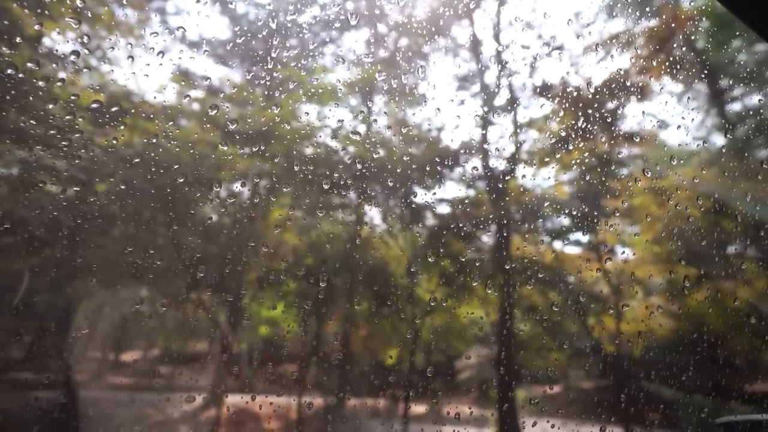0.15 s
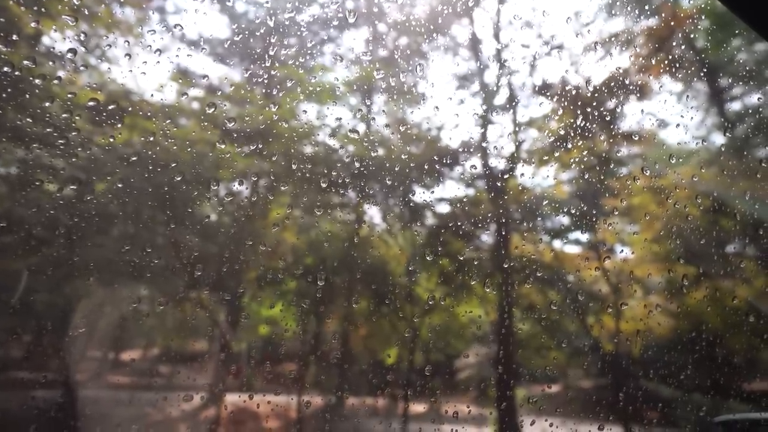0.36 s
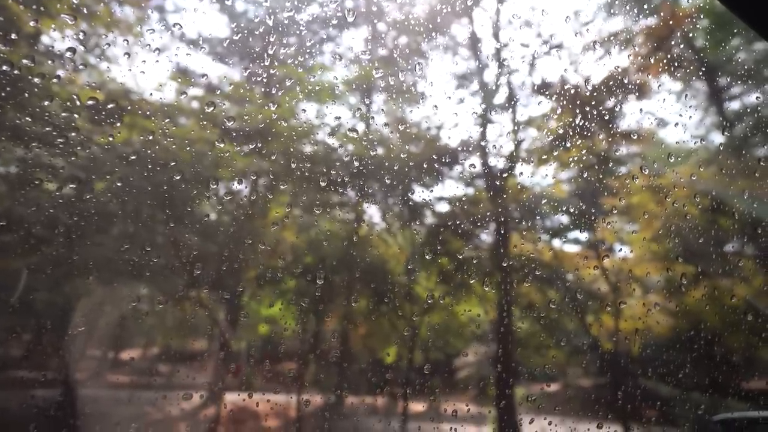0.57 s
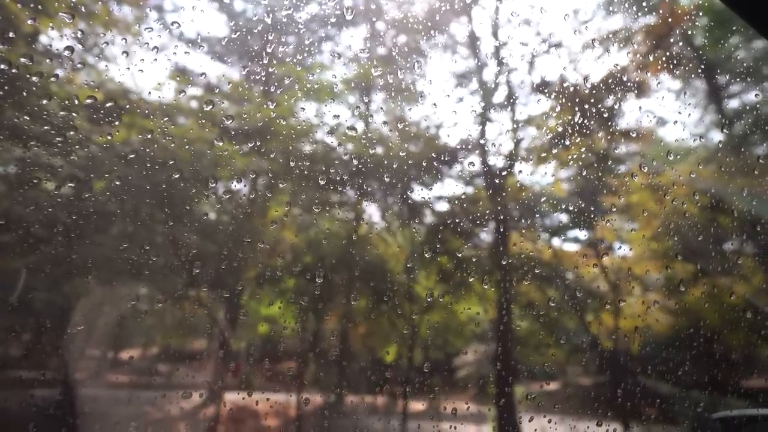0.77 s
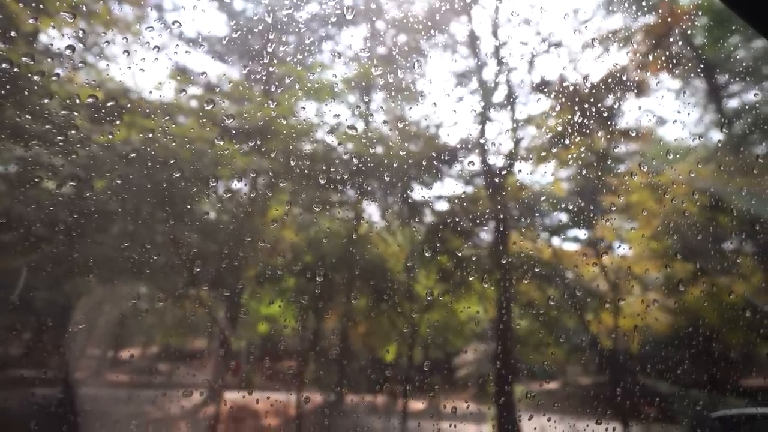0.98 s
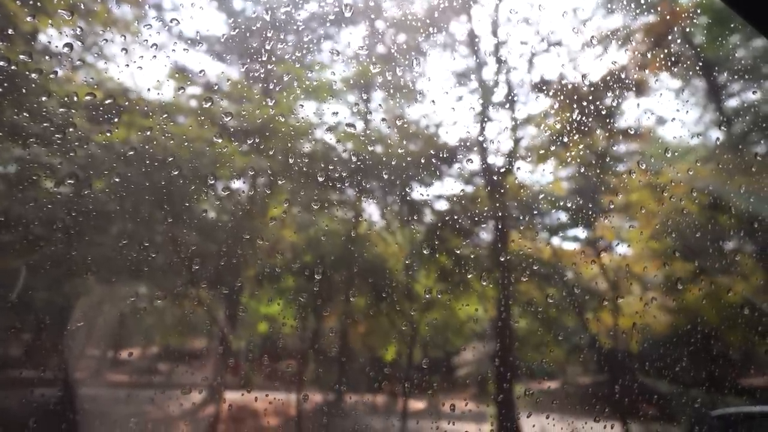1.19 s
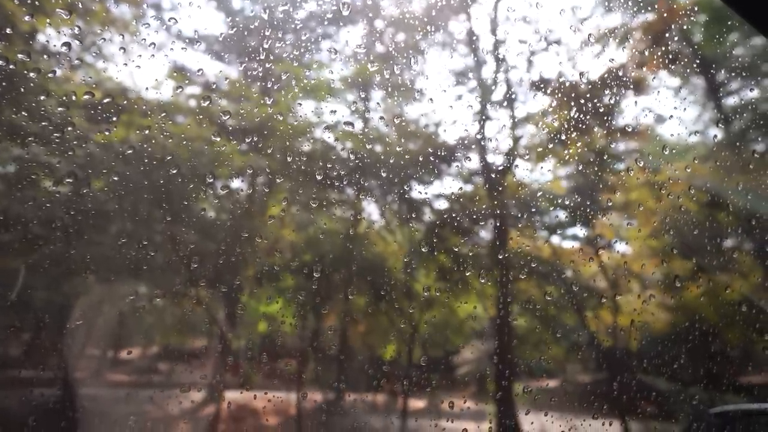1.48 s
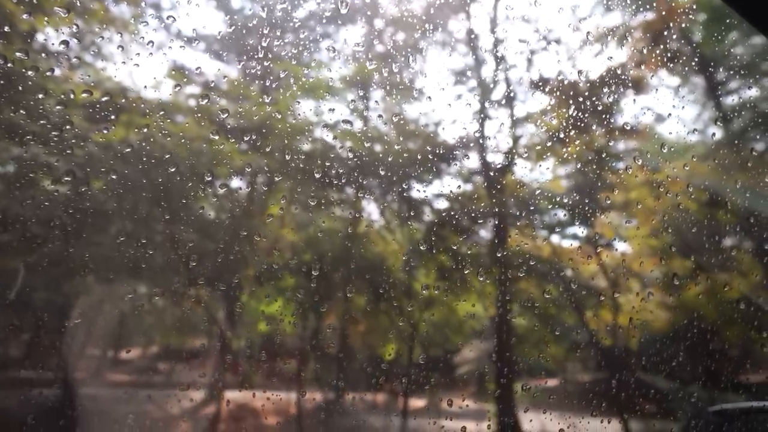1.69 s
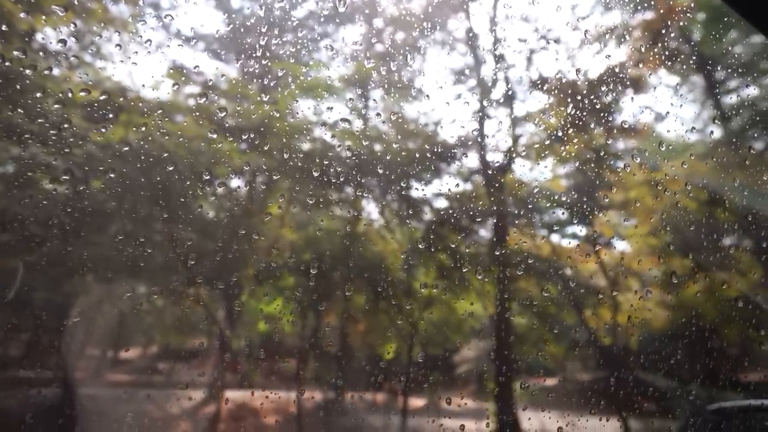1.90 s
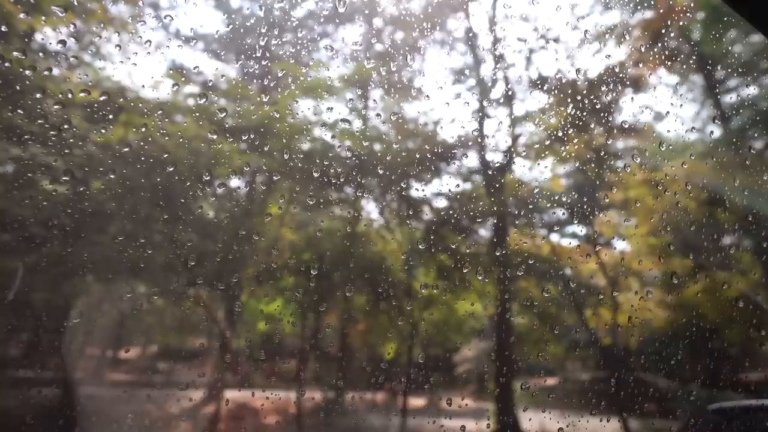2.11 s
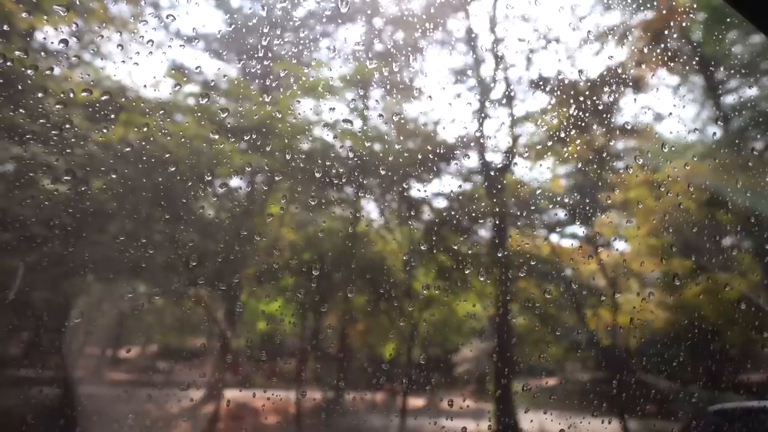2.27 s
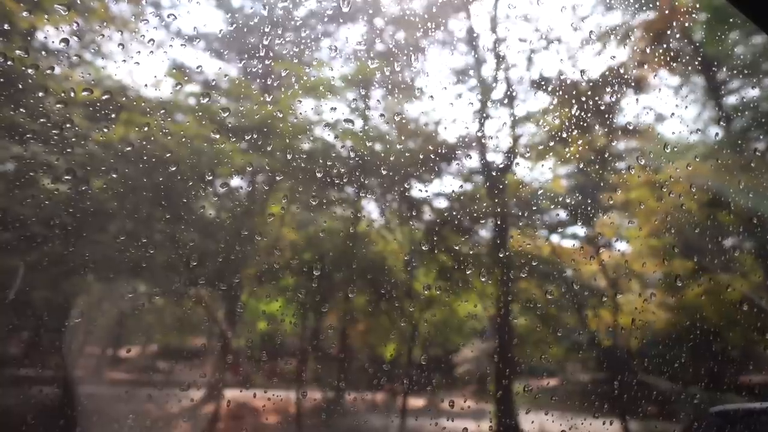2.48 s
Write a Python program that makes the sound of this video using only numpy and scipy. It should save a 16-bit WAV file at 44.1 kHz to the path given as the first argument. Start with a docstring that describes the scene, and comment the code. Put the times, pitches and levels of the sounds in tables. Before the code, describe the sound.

Raindrops drum on a parked car's roof and tick on its glass, heard from the cabin

```python
"""Rain on a car, heard from inside

Big drops excite the lined roof as dense and discrete decaying modes: boom, hollow ring and splash.
Some struck spots of the roof, and once a pane, add a hollow tok of two pitches.
Drops on the glass give a bright pitched tick and a short knock of the pane.
Randomly timed small drops make patter and spray, over a wash of coloured noise.
Beneath lie a sway and a drone of wavering sines, a growing rumble and a hum that fades and returns.
"""
import sys
import numpy as np
from scipy.fft import rfft, irfft, next_fast_len
from scipy.io import wavfile
from scipy.ndimage import map_coordinates

SR = 44100
rng = np.random.default_rng(int(sys.argv[2]) if len(sys.argv) > 2 else 0)


def transcribe(u):
    """Save the signal u as a 16-bit wav file named by the first command-line argument.

    u: samples, shape (n,) or (channels, n), limited to [-1, 1]; the rate is SR.
    q: integer samples, one column per channel.
    """
    v = np.clip(np.atleast_2d(u).T, -1, 1)
    q = np.round(v * 32767).astype(np.int16)
    wavfile.write(sys.argv[1], SR, q)


N = 116865  # length in samples

# Big drops on the roof, blended by where they land. Each row: start in seconds, then boom, hollow ring
# and splash levels in dB before the trims below, and centre of the boom in Hz.
ROOF_DROPS = [(.076, -37.5, -36.5, -42.5, 456), (.128, -38.5, -42.5, -41.5, 435),
              (0.207, -46, -43.5, -45, 402), (.248, -43, -34, -48, 560), (0.381, -54, -38.5, -44.5, 348),
              (.435, -42, -50, -45, 397), (0.473, -45, -38, -49, 251), (.516, -47, -49, -45, 450),
              (0.546, -42.5, -41.5, -46.5, 800), (0.612, -45.5, -47, -46.5, 446),
              (.676, -35, -37, -60, 280), (.75, -47, -43.5, -44.5, 400), (0.859, -50, -39, -40.5, 234),
              (.866, -37, -43, -39, 250), (.872, -44, -38, -40, 432), (0.894, -36, -48, -61, 427),
              (1.263, -41, -48, -43.5, 344), (1.29, -45.5, -52, -42.5, 350), (1.439, -42, -44, -48, 770),
              (1.485, -43, -57, -41, 400), (1.644, -46, -42.5, -44.5, 460), (1.743, -37.5, -37.5, -39, 510),
              (1.805, -35.5, -37, -39.5, 376), (1.82, -43, -44, -41, 400), (1.84, -38, -35.5, -39, 600),
              (1.846, -40, -37.5, -42.5, 620), (1.895, -48, -47, -39.5, 450),
              (1.947, -40.5, -48, -40.5, 554), (2.01, -41, -42, -43, 560), (2.089, -40, -62, -39, 480),
              (2.116, -49, -42, -46, 480), (2.21, -48, -36.5, -41.5, 430), (2.34, -40, -41, -41.5, 326),
              (2.389, -37.5, -39.5, -40, 430), (2.428, -33, -38, -38.5, 460), (2.441, -42.5, -50, -61, 520),
              (2.538, -39, -41, -51, 300), (2.565, -39, -56, -40, 256), (2.612, -40.5, -65, -39, 370)]
# Discrete roof modes. Each row: frequency in Hz, relative level in dB, t60 in seconds.
LOW_MODES = [(204.8, -3.5, 0.28), (262.3, 0.5, 0.083), (343.8, -18, 0.32), (422.7, -1, 0.15),
             (519.4, -0.5, 0.19), (597.6, 5.5, 0.077), (791, 4.5, 0.17)]
HOLLOW_MODES = [(871, -12, 0.16), (958.6, -11, 0.25), (1003, -4, 0.25), (1090.5, 8, 0.07),
                (1195, -16.5, 0.22), (1470, -14, 0.095)]
# Spectra of a big drop's boom, hollow ring and splash. Each row: frequency in Hz, relative level in dB per Hz.
BOOM_COLOUR = [(60, -45), (150, -8), (230, -3), (450, 4), (650, -0.5), (850, -9.5), (1400, -32),
               (4000, -57)]
HOLLOW_COLOUR = [(200, -61), (700, -6), (1060, -0.5), (1350, -4.5), (1900, -7), (5000, -36.5)]
SPLASH_COLOUR = [(300, -65), (1100, 0), (1600, 4.5), (2400, 2.5), (3200, -2), (4000, -9.5), (6000, -12),
                 (8500, -25), (15000, -33)]
# Decay of the roof and of the glass. Each row: frequency in Hz, t60 in seconds.
ROOF_RING = [(150, 0.16), (1000, 0.13), (2500, 0.1), (9000, 0.13)]
GLASS_RING = [(150, 0.073), (1000, 0.059), (3000, 0.023), (9000, 0.034)]
# Clear two-pitched rings of struck spots on the roof, and of the pane at 2.0655 s. Each row: start in
# seconds, low pitch in Hz, its level in dB, high pitch in Hz, its level in dB, t60 in seconds.
KNOCKS = [(.2515, 529, -30, 1061, -26, 0.077), (.475, 239, -42, 1017, -32, 0.087),
          (.677, 281, -30, 1060, -42, 0.079), (.866, 438, -24.5, 870, -43, 0.084),
          (.873, 243, -37, 1136, -27.5, 0.075), (1.807, 408, -31, 1053, -24.5, .06),
          (1.847, 636, -24.5, 968, -27, 0.048), (2.0655, 560, -38, 1130, -21, 0.031),
          (2.429, 442, -27, 990, -52, 0.069), (2.438, 528, -30.5, 1089, -30, 0.11)]
# Sharp drops on the glass. Each row: start in seconds, level in dB before the trims below,
# knock of the pane against the tick in dB, pitch of the tick in Hz.
GLASS_DROPS = [(0.1068, -22.5, -11, 3240), (0.152, -34, -4, 8000), (0.366, -34.5, 4.5, 7500),
               (0.475, -33, 1, 8050), (.72, -34, -18, 8000), (0.777, -32, -23, 4460),
               (0.867, -26.5, 2, 3030), (0.933, -29, -19, 3450), (1.208, -29, -4.5, 8450),
               (1.453, -33, -13, 6400), (1.777, -36, -46, 8300), (1.872, -30, -9, 5000),
               (1.894, -25.5, -2.5, 8000), (2.065, -18, -2.5, 6100), (2.067, -18.5, -3.5, 8400),
               (2.177, -28, 0.5, 2830), (2.219, -30, -8, 5200), (2.391, -29, 4, 5100),
               (2.445, -29, -27, 7900), (2.56, -28, -1, 8200)]
# Spectra of a tick on glass and of a pane's knock. Each row: frequency in Hz, relative level in dB per Hz.
TICK_COLOUR = [(200, -7), (1000, 0), (2200, 3.5), (3300, 6), (4500, 2), (8300, -5), (11000, -18.5),
               (15000, -16)]
PANE_COLOUR = [(50, -13), (130, 3), (500, -4), (800, -1.5), (1150, -3), (1600, -11), (2200, -6),
               (4000, -68), (15000, -58)]
# Strength of the shower before the trims of its layers. Each row: time in seconds, level in dB.
SHOWER_LEVEL = [(0, -43.5), (.15, -48), (.28, -48), (.32, -49), (.38, -45.5), (.55, -47.5), (.65, -48.5),
                (.77, -44.5), (.84, -46.5), (1.1, -48), (1.33, -42), (1.42, -45.5), (1.5, -43.5),
                (1.59, -47), (1.85, -46.5), (2.15, -43), (2.48, -45), (2.6, -42.5)]
# Spectra of a small roof drop and of the wash. Each row: frequency in Hz, relative level in dB per Hz.
PATTER_COLOUR = [(60, -49), (150, -0.5), (260, 1.5), (500, 0), (700, -2.5), (772, -1.5), (850, -17),
                 (1000, 2), (1085, 2), (1200, -9.5), (1400, -5), (2200, -4), (3800, -19), (8000, -25.5),
                 (15000, -41.5)]
WASH_COLOUR = [(50, 8), (130, 6), (450, 3), (780, -2), (1050, -5), (1500, -6.5), (2400, -12.5),
               (4000, -14.5), (8000, -18.5), (10000, -19.5), (15500, -21)]
# Slow sway of the cabin air, before its wobble and ceiling. Each row: time in seconds, level in dB.
SWAY_LEVEL = [(0.0, -25.5), (0.15, -17.5), (0.24, -25), (0.34, -7), (0.67, -9), (0.75, -22.5),
              (0.88, -10.5), (0.94, -18.5), (1.41, -10), (2.16, -11), (2.28, 1), (2.47, -10.5), (2.53, -8),
              (2.63, -11.5)]
# Deep resonance of the cabin, before its trim and wobble. Each row: time in seconds, level in dB.
DRONE_LEVEL = [(.04, -30), (.12, -31), (.25, -41), (.68, -36), (.98, -33), (1.15, -47), (1.21, -20),
               (1.3, -37), (1.48, -34), (1.67, -35), (1.8, -40), (1.85, -24.5), (1.92, -28), (2.04, -33),
               (2.1, -20), (2.21, -41), (2.5, -32)]
# Low rumble and low hum. Each row: time in seconds, level in dB.
RUMBLE_LEVEL = [(0, -45.5), (1.5, -40), (2.6, -31)]
HUM_LEVEL = [(0, -47), (.7, -59.5), (1.2, -55), (1.6, -45.5), (2.2, -42), (2.65, -49)]
# Spectrum of the rumble. Each row: frequency in Hz, relative level in dB per Hz.
RUMBLE_COLOUR = [(15, -7.5), (27, -9), (36, 0), (46, -9), (56, -8.5), (66, -11), (82, -17.5), (100, -22.5),
                 (160, -35), (400, -98)]

ROOF_RISE_S, PATTER_RISE_S, GLASS_RISE_S = 0.0012, 0.0014, 0.000066
BOOM_DB, HOLLOW_DB, SPLASH_DB, LOW_MODES_DB, HOLLOW_MODES_DB = 4, 3, 5.5, 3.5, 2.5
FOCUS_DB, FOCUS_OCTAVES = 17.5, 0.47  # boost of the low modes near a drop's centre
MODES_RISE_S, MODES_SCATTER_DB = 0.0049, 1.5
KNOCK_RISE_S = 0.0018
# short-lived modes on either side roughen the attack of a knock
NEIGHBOUR_STEP, NEIGHBOUR_DB, NEIGHBOUR_T60_S = 1.11, -8, 0.051
TICK_DB, PANE_DB = -9.5, -3
CRACK_DB, CRACK_T60_S, CRACK_RISE_S = -5.5, 0.0027, 0.00004
TICK_PEAK_DB, TICK_WIDTH_OCTAVES = 5, 0.28
PATTER_PER_S, PATTER_SPREAD_DB, PATTER_DB = 85, 3.5, 2.5
SPRAY_PER_S, SPRAY_SPREAD_DB, SPRAY_DB = 70, 3, -11.5
PATTER_TONE_DB = -9  # each small roof drop favours one mode
WASH_DB, WASH_FOLLOWS = -41, 0.6  # share of the shower's dB swing that the wash follows
SWAY_HZ, SWAY_WANDER, SWAY_MAX_DB = 10, 0.1904, -5.5  # middle pitch, its log wander, ceiling
DRONE_HZ, DRONE_WANDER, DRONE_DB, DRONE_WOBBLE_DB = 33, 0.19, -1.0, 3.2
HUM_HZ, HUM_WANDER_HZ, HUM_OCTAVE_DB = 99.74, 1.576, -25
TOP_HZ = 15750


def amp(db):
    """Level to amplitude: 20 dB is a factor of ten."""
    return 10 ** (np.asarray(db) / 20)


def unit(x):
    """Normalisation to rms 1."""
    return x / np.sqrt(np.mean(x ** 2) + 1e-20)


def along(points, hz):
    """Linear interpolation of (Hz, value) points on a logarithmic frequency axis."""
    f, v = np.transpose(points)
    return np.interp(np.log(hz + 1), np.log(f + 1), v)


def curve(rows):
    """Linear interpolation of (seconds, value) points to one value per sample."""
    return np.interp(np.arange(N) / SR, *np.transpose(rows))


def wobble(rate):
    """Spline interpolation of random knots, rate of them a second."""
    return map_coordinates(rng.standard_normal(256), [np.arange(N) * rate / SR], mode="wrap")


def bump(hz, centre_hz, octaves):
    """Resonance-like Gaussian weight on an octave scale, 1 at the centre."""
    return np.exp(-.5 * (np.log2(hz / centre_hz) / octaves) ** 2)


def filtered(x, response):
    """Linear filtering: the spectrum times a response of frequency."""
    m = next_fast_len(N + SR // 2)
    return irfft(rfft(x, m) * response(np.fft.rfftfreq(m, 1 / SR)), m)[:N]


def noise(colour):
    """Spectral shaping of white noise, to rms 1."""
    return unit(filtered(rng.standard_normal(N), lambda hz: amp(along(colour, hz))))


def sine(hz):
    """Phase as the running integral of a varying frequency, to rms 1."""
    return unit(np.sin(2 * np.pi * np.cumsum(hz) / SR))


def rings(colour, ring, rise_s, count, size=8192):
    """Dense panel modes of random phase, one strike per row, each with frequency-dependent decay."""
    hz, t = np.fft.rfftfreq(size, 1 / SR), np.arange(size) / SR
    modes = np.exp(2j * np.pi * rng.random((count, len(hz)))) * amp(along(colour, hz))
    modes /= irfft(modes[0]).std()
    out = 0
    # overlapping bands, each fading at its own t60
    for (_, t60), pick in zip(ring, np.eye(len(ring))):
        band = along([(f, p) for (f, _), p in zip(ring, pick)], hz)
        out = out + irfft(modes * band) * amp(-60 * t / t60)
    return out * (1 - np.exp(-t / rise_s))


def modal(modes, rise_s=MODES_RISE_S, size=8192):
    """Modal superposition: a few decaying sines, struck with a new balance and phase each time."""
    hz, db, t60 = np.transpose(modes)[..., None]
    t = np.arange(size) / SR
    gain = amp(db + MODES_SCATTER_DB * rng.standard_normal(db.shape))
    waves = np.sin(2 * np.pi * (hz * t + rng.random(hz.shape))) * amp(-60 * t / t60)
    mix = np.sqrt(2) * (gain * waves).sum(0) / np.linalg.norm(gain)
    return mix * (1 - np.exp(-t / rise_s))


def add(track, s, sound):
    """Superposition of a sound onto the track at time s."""
    part = track[max(round(s * SR), 0):][:len(sound)]
    part += sound[:len(part)]


def roof_drops():
    """Impact excitation of a panel: dense boom, ring and splash, with low modes favoured near a centre."""
    out = np.zeros(N)
    booms, hollows, splashes = (rings(colour, ROOF_RING, ROOF_RISE_S, count=len(ROOF_DROPS))
                                for colour in (BOOM_COLOUR, HOLLOW_COLOUR, SPLASH_COLOUR))
    for drop, boom, hollow, splash in zip(ROOF_DROPS, booms, hollows, splashes):
        s, boom_db, ring_db, splash_db, centre_hz = drop
        focused = [(hz, db + FOCUS_DB * bump(hz, centre_hz, FOCUS_OCTAVES), t60)
                   for hz, db, t60 in LOW_MODES]
        add(out, s, amp(boom_db + BOOM_DB) * boom)
        add(out, s, amp(ring_db + HOLLOW_DB) * hollow)
        add(out, s, amp(splash_db + SPLASH_DB) * splash)
        add(out, s, amp(boom_db + LOW_MODES_DB) * modal(focused))
        add(out, s, amp(ring_db + HOLLOW_MODES_DB) * modal(HOLLOW_MODES))
    return out


def knocks():
    """Position-dependent modal excitation: a hollow tok of two pitches, set by the spot that is struck."""
    out = np.zeros(N)
    for s, low_hz, low_db, high_hz, high_db, t60 in KNOCKS:
        for hz, db in ((low_hz, low_db), (high_hz, high_db)):
            neighbours = [(hz * NEIGHBOUR_STEP ** k, NEIGHBOUR_DB, NEIGHBOUR_T60_S) for k in (-1, 1)]
            add(out, s, amp(db) * modal([(hz, 0, t60)] + neighbours, KNOCK_RISE_S))
    return out


def glass_drops():
    """Short impact on a stiff pane: a brief pitched crack, a bright tick and a lower knock."""
    out = np.zeros(N)
    hz = np.geomspace(100, 16000, 80)
    for s, db, knock_db, tick_hz in GLASS_DROPS:
        colour = along(TICK_COLOUR, hz) + TICK_PEAK_DB * bump(hz, tick_hz, TICK_WIDTH_OCTAVES)
        tick, = rings(np.column_stack([hz, colour]), GLASS_RING, GLASS_RISE_S, count=1)
        knock, = rings(PANE_COLOUR, GLASS_RING, GLASS_RISE_S, count=1)
        crack = modal([(tick_hz, 0, CRACK_T60_S)], CRACK_RISE_S)
        drop = amp(CRACK_DB) * crack + amp(TICK_DB) * tick + amp(PANE_DB + knock_db) * knock
        add(out, s, amp(db) * drop)
    return out


def scatter(sounds, per_s, spread_db, count=1200):
    """Shot-noise principle: impacts of random size at jittered times, to rms 1."""
    out = np.zeros(N)
    times = (np.arange(count) + rng.uniform(-1, 2, count)) / per_s
    sizes = amp(spread_db * np.clip(rng.standard_normal(count), -2, 2))
    for k in np.flatnonzero((times > 0) & (times < N / SR)):
        add(out, times[k], sizes[k] * sounds[k % len(sounds)])
    return unit(out)


def roof_patter():
    """Summed small impacts: soft roof thuds, each with one favoured mode."""
    modes = LOW_MODES + HOLLOW_MODES
    taps = []
    for thud in rings(PATTER_COLOUR, ROOF_RING, PATTER_RISE_S, count=96):
        mode = modes[rng.integers(len(modes))]
        taps.append(thud + amp(PATTER_TONE_DB) * modal([mode], KNOCK_RISE_S))
    return scatter(taps, PATTER_PER_S, PATTER_SPREAD_DB)


def glass_spray():
    """Summed small impacts: fine bright ticks on the glass."""
    ticks = rings(TICK_COLOUR, GLASS_RING, GLASS_RISE_S, count=64)
    return scatter(ticks, SPRAY_PER_S, SPRAY_SPREAD_DB)


def small_drops():
    """Common modulation: patter, spray and an even wash of noise follow the shower's strength."""
    shower_db = curve(SHOWER_LEVEL)
    drops = amp(PATTER_DB) * roof_patter() + amp(SPRAY_DB) * glass_spray()
    wash_db = WASH_DB + WASH_FOLLOWS * (shower_db - shower_db.mean())
    return amp(shower_db) * drops + amp(wash_db) * noise(WASH_COLOUR)


def sway():
    """Infrasonic oscillation of air pressure, wandering in frequency and level below a ceiling."""
    hz = SWAY_HZ * np.exp(SWAY_WANDER * wobble(11))
    level_db = np.minimum(curve(SWAY_LEVEL) + wobble(7.99), SWAY_MAX_DB)
    return amp(level_db) * sine(hz)


def drone():
    """Cabin resonance as a deep sine that swells, dips and wavers in pitch."""
    level_db = curve(DRONE_LEVEL) + DRONE_DB + DRONE_WOBBLE_DB * wobble(20)
    return amp(level_db) * sine(DRONE_HZ * np.exp(DRONE_WANDER * wobble(18)))


def rumble():
    """Low-frequency coloured noise under a rising level."""
    return amp(curve(RUMBLE_LEVEL)) * noise(RUMBLE_COLOUR)


def hum():
    """Harmonic tone: a slightly wandering low sine and its faint octave."""
    turn = 2 * np.pi * np.cumsum(HUM_HZ + HUM_WANDER_HZ * wobble(7.71)) / SR
    return amp(curve(HUM_LEVEL)) * unit(np.sin(turn) + amp(HUM_OCTAVE_DB) * np.sin(2 * turn))


def scene():
    """Linear superposition of all sources, as heard from the front seat."""
    rain = roof_drops() + knocks() + glass_drops() + small_drops()
    cabin = sway() + drone() + rumble() + hum()
    return (rain + cabin)[None]


def record(dry):
    """Ideal low-pass filtering: nothing at or above the band limit remains."""
    return np.array([filtered(x, lambda hz: hz < TOP_HZ) for x in dry])


dry = scene()
out = record(dry)
transcribe(out)
```